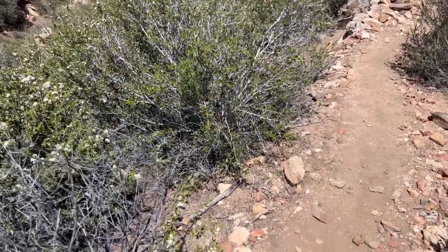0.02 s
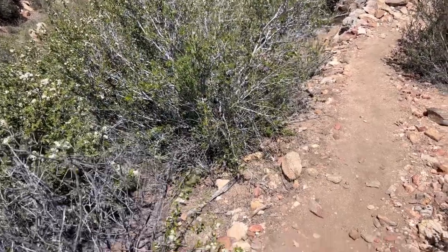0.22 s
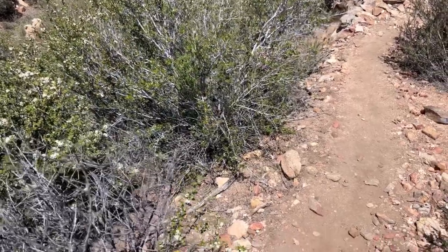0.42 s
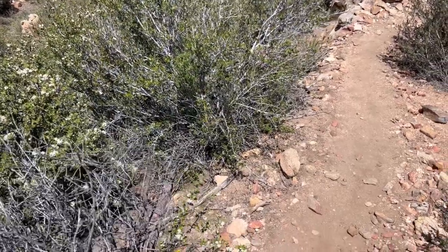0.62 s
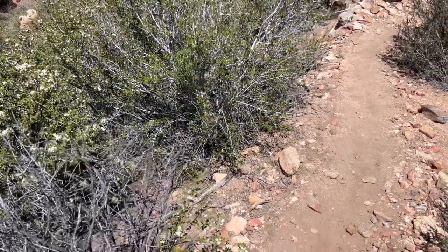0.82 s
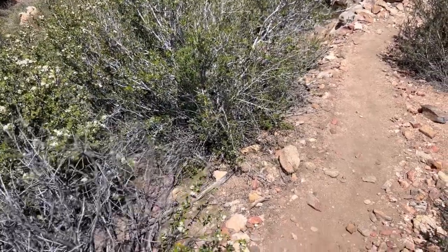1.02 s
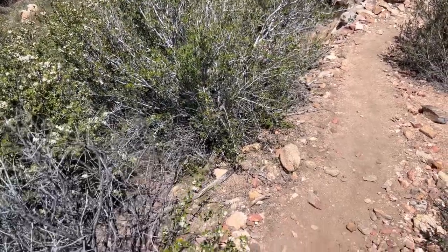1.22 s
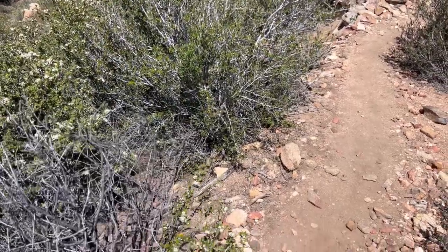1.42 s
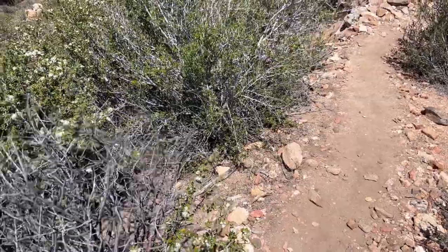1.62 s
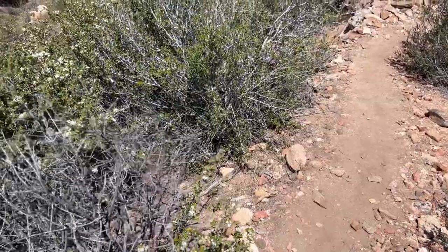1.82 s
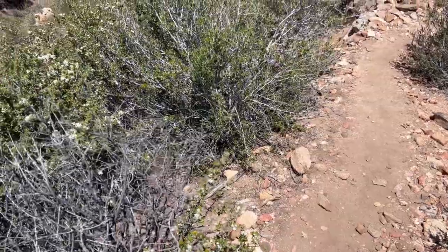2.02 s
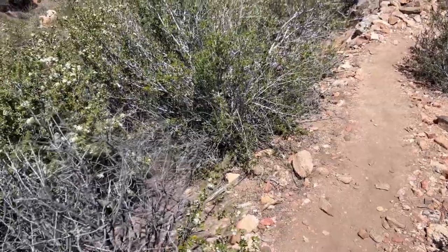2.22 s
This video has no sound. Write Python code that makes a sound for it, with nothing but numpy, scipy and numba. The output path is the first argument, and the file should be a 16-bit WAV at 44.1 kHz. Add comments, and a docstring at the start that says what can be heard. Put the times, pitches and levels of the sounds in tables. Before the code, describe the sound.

A rattlesnake's steady dry high buzz from a bush, under low wind rumble thumping the microphone

```python
"""A steady dry buzz over a low wind rumble: a rattlesnake shakes its tail inside a bush by a dirt trail.
The tail's hollow segments knock together, ring, and scatter off twigs, stems and ground.
A breeze, made of shaped noise, rumbles on the microphone, mostly at the left port, and thumps it twice
deeply; one faint, higher thud follows. A shoe shifts on the grit: short noise bursts for the small stones,
a click for a snap, a pulse for the heel."""
import sys
import numpy as np
from scipy import signal
from scipy.fft import rfft, irfft, next_fast_len
from scipy.io import wavfile
from scipy.ndimage import uniform_filter1d
from numba import njit

SR = 44100
rng = np.random.default_rng(int(sys.argv[2]) if len(sys.argv) > 2 else 0)


def to_wav(s):
    """Save 16-bit WAV."""
    ch = np.atleast_2d(s).T  # columns
    pcm = np.round(np.clip(ch, -1, 1) * 32767)  # PCM
    wavfile.write(sys.argv[1], SR, pcm.astype(np.int16))


N = 101430
T = np.arange(N) / SR  # seconds


def undb(db):
    """Decibels to gain."""
    return 10 ** (np.asarray(db) / 20)


def unit(x):
    """Scale to rms 1."""
    return x / np.sqrt(np.mean(x ** 2) + 1e-20)


def curve(rows):
    """Gain over time along a table of (s, dB)."""
    return undb(np.interp(T, *np.array(rows).T))


def colour(x, points):
    """Causal minimum-phase filter of unit power gain through (Hz, dB) points."""
    size = next_fast_len(N + 8192)
    size += size % 2
    hz, db = np.array(points, float).T
    bin_hz = np.arange(size // 2 + 1) * SR / size
    gain = undb(np.interp(np.log(bin_hz + 1), np.log(hz), db))
    # folding the cepstrum onto positive time makes the filter causal
    cepstrum = irfft(np.log(unit(gain)))
    cepstrum[1:size // 2] *= 2
    cepstrum[size // 2 + 1:] = 0
    response = np.exp(rfft(cepstrum))
    return irfft(rfft(x, size) * response)[..., :N]


def band(x, hz, width_hz):
    """One fixed resonance."""
    return signal.lfilter(*signal.iirpeak(hz, hz / width_hz, fs=SR), x)


@njit
def sweep(x, hz, width):
    """A resonance whose centre moves: a state-variable filter retuned at every sample."""
    y, b, l = np.empty(len(x)), 0., 0.  # output, band state, low state
    for i in range(len(x)):
        g, k = np.tan(np.pi * hz[i] / SR), width / hz[i]
        v = (b + g * (x[i] - l)) / (1 + g * (g + k))
        b, l, y[i] = 2 * v - b, l + 2 * g * v, k * v
    return y


def walk(rate):
    """Smooth random drift with spread 1, drawn afresh about `rate` times a second."""
    hold = int(SR / rate)
    steps = np.repeat(rng.standard_normal(N // hold + 1), hold)
    smooth = uniform_filter1d(uniform_filter1d(steps, hold), hold)[:N]
    return unit(smooth - smooth.mean())


def push(at, width):
    """A short pressure pulse that swings back on either side."""
    u = ((T - at) / width) ** 2
    return (1 - u) * np.exp(-u / 2)


AIR_DB, AIR_SIDE_DB = -54.5, -8  # level; left-right difference relative to it
# Colour of the open air. Each row: frequency in Hz, density in dB per Hz (relative).
AIR_COLOUR = [(100, -6.5), (400, 4), (700, -0.5), (1150, -6), (1600, -0.5), (2400, -4.5), (4000, -3),
              (8000, -9), (10300, -54), (11200, -28.5), (12500, -22), (13500, -40), (15500, -9.5)]


def air():
    """Faint hush of the open hillside: coloured noise with a weaker part opposed between the ports."""
    mid, side = colour(rng.standard_normal((2, N)), AIR_COLOUR)
    return undb(AIR_DB) * (mid + undb(AIR_SIDE_DB) * side * np.array([[1], [-1]]))


def turbulence(shape, even_s):
    """Coloured noise whose strength is evened over spans longer than even_s, leaving rms near 1."""
    x = colour(rng.standard_normal(N), shape)
    power = uniform_filter1d(np.abs(signal.hilbert(x)) ** 2 / 2, max(int(even_s * SR), 1))
    return x / np.sqrt(power + 1e-9)


GUST_LIMIT = .7  # envelope ceiling


def level_off(x):
    """The strongest gusts level off smoothly and stay round."""
    strength = uniform_filter1d(np.abs(signal.hilbert(x)), size=220)  # about 5 ms
    return x / (1 + (strength / GUST_LIMIT) ** 4) ** (1 / 4)


WIND_PAN_DB, WIND_APART_DB = 10, -17.5  # right port weaker by; its own rumble relative to the breeze
FLUTTER_DB = -46.5  # flutter around 200 Hz between the eddies
PORT_LOW_HZ, PORT_TOP_HZ = 29.2, 1780  # pass band of the port for wind
# Breeze and eddy levels hold before the level-off; thumps join after it, before the port filter.
# The breeze. Each row: time in seconds, level in dB.
BREEZE_LEVEL = [(0, -23), (.15, -24.5), (.26, -22), (.36, -19.5), (.46, -22.5), (.56, -24.5), (.74, -23.5),
                (.84, -33), (.93, -21), (.98, -27.5), (1.015, -21), (1.06, -27.5), (1.18, -21.5),
                (1.26, -26), (1.41, -25.5), (1.55, -27.5), (1.64, -31.5), (1.84, -26), (1.95, -28.5),
                (2.12, -30), (2.3, -23)]
# Eddies that buffet the port. Each row: middle in seconds, half length in seconds, rumble in dB,
# flutter in dB.
BUFFETS = [(0.122, .012, -42, -34.5), (0.193, 0.023, -49, -38.5), (0.248, 0.0091, -25.5, -35.5),
           (.388, 0.0064, -11, -27), (0.438, 0.02, -20.5, -34.5), (0.608, 0.0088, -21.5, -21.5),
           (0.634, 0.015, -6.5, -16.5), (0.663, .011, -12, -29), (0.831, 0.0095, -28.5, -43),
           (0.932, 0.014, -23, -56), (0.983, 0.0055, -45, -44), (1.012, 0.0085, -23, -64),
           (1.096, 0.012, -21, -55), (1.178, 0.0092, -20, -61), (1.314, .011, -17.5, -46),
           (1.344, .01, -16, -25.5), (1.464, 0.011, -27.5, -38.5), (1.528, 0.0088, -34, -37),
           (1.569, 0.01, -24, -41), (1.741, 0.0083, -26, -38), (1.817, 0.013, -27, -47),
           (2.181, 0.0078, -33, -34.5)]
# Two deep thumps, then a faint, higher thud. Each row: middle in seconds, width in seconds, peak in dB.
THUMPS = [(0.402, 0.0018, 2), (0.618, 0.0019, -3), (.98, 0.00068, -36)]
# Colours of breeze, eddy rumble and flutter. Each row: frequency in Hz, density in dB per Hz (relative).
BREEZE_COLOUR = [(15, -25.5), (28, -21.5), (45, 1), (70, 4), (100, -3.5), (125, -15.5), (190, -25),
                 (255, -36), (400, -65.5), (2000, -99)]
BUFFET_COLOUR = [(20, -43), (50, 1), (82, 13.5), (115, 1.5), (165, -5.5), (245, -24), (320, -29),
                 (420, -53), (800, -70), (2000, -73)]
FLUTTER_COLOUR = [(60, -28), (120, 5), (170, 7), (255, -2.5), (305, -22.5), (400, -27.5), (800, -43),
                  (2000, -87.5)]


def wind():
    """Turbulent pressure at the ports: breeze, eddies that rumble and flutter, thumps; strongest at left."""
    breeze = curve(BREEZE_LEVEL)
    swells = np.array([np.exp(-np.abs((T - at) / half) ** 3 / 2) for at, half, _, _ in BUFFETS])
    rumble, flutter = undb(np.array(BUFFETS)[:, 2:].T) @ swells
    thumps = sum(undb(db) * push(at, width) for at, width, db in THUMPS)

    gusts = breeze * turbulence(BREEZE_COLOUR, 0.038)
    gusts = gusts + rumble * turbulence(BUFFET_COLOUR, 0.031)
    gusts = gusts + (undb(FLUTTER_DB) + flutter) * turbulence(FLUTTER_COLOUR, 0.02)
    left = level_off(gusts) - thumps

    apart = undb(WIND_APART_DB) * breeze * turbulence(BREEZE_COLOUR, 0.036)
    right = left * undb(-WIND_PAN_DB) + apart
    port = signal.butter(2, [PORT_LOW_HZ, PORT_TOP_HZ], "bandpass", fs=SR, output="sos")
    return signal.sosfiltfilt(port, np.array([left, right]), padtype="even")


SNAP_S, SNAP_DB = 2.0035, -9  # one stone snaps; click peak before colouring
HEEL_S, HEEL_WIDTH_S, HEEL_DB = 2.0125, .0027, -18  # middle, width and peak of the thud
# Grit under the shoe. Each row: start in seconds, level in dB, decay to 1/e in seconds,
# high crackle in dB relative to that level.
GRIT = [(0.268, -44.5, 0.0036, -8.5), (0.4885, -45.5, 0.0012, 4), (0.508, -44, 0.0025, -3.5),
        (0.711, -45.5, 0.003, -15), (0.79, -44, 0.0024, -18), (0.98, -54.5, 0.0041, 5.5),
        (1.639, -40, 0.0032, -23), (1.917, -48.5, 0.004, -2), (1.964, -47.5, 0.024, -4),
        (1.982, -47.5, 0.0071, -15), (1.99, -50, 0.0069, -5), (2.0031, -27, 0.0017, -16.5),
        (2.009, -41.5, 0.011, -16), (2.058, -48, 0.015, -17), (2.213, -42.5, 0.0057, -16),
        (2.253, -49, 0.0048, -16)]
# Colours of grit and high crackle. Each row: frequency in Hz, density in dB per Hz (relative).
GRIT_COLOUR = [(200, -11), (450, 3), (750, 5), (1200, 6), (1900, -1), (2800, -20), (4500, -15), (9000, -51)]
CRACKLE_COLOUR = [(600, -47), (1200, -7), (2200, 4), (3000, 5), (4500, -17), (9000, -35)]


def shoe():
    """Small stones scrape in decaying noise bursts and one snaps; the heel settles with a soft thud."""
    bursts = [undb(db) * (T >= at) * np.exp(-np.abs(T - at) / decay) for at, db, decay, _ in GRIT]
    high = sum(burst * undb(row[3]) for burst, row in zip(bursts, GRIT))
    snap = undb(SNAP_DB) * (np.arange(N) == int(SNAP_S * SR))
    grit = colour(snap + sum(bursts) * rng.standard_normal(N), GRIT_COLOUR)
    crackle = colour(high * rng.standard_normal(N), CRACKLE_COLOUR)
    heel = undb(HEEL_DB) * push(HEEL_S, HEEL_WIDTH_S)
    return grit + crackle + heel


SHAKE_HZ, SHAKE_DRIFT = 59.93, .025  # tail cycles a second; their drift as a fraction
STROKE_SPREAD, KNOCK_SCATTER_DB = .17, 1  # scatter of the knocks in strokes; their unevenness


def knocks(count=12):
    """At both ends of each swing of the tail the segments knock together: a cluster of scattered clicks."""
    strokes = np.cumsum(2 * SHAKE_HZ * (1 + SHAKE_DRIFT * walk(4))) / SR
    chance = rng.standard_normal((int(strokes[-1]) + 1, count, 2))
    when = np.arange(len(chance))[:, None] + STROKE_SPREAD * chance[..., 0]
    where = np.searchsorted(strokes, when).ravel()
    sign = (-1) ** np.arange(count)
    size = (undb(KNOCK_SCATTER_DB * chance[..., 1]) * sign).ravel()
    return np.bincount(where, size * (where > 0), N + 1)[:N]


TWIG_T60_S, TWIG_DB = 0.06, 4.5  # time to fall 60 dB; scattered sound relative to the knock


def bush(x):
    """Twigs and ground scatter each knock into a short diffuse tail of noise."""
    decay = np.exp(-2 * np.log(1000) / (TWIG_T60_S * SR))
    power = signal.lfilter([1 - decay], [1, -decay], x ** 2)
    return unit(x + undb(TWIG_DB) * np.sqrt(power) * rng.standard_normal(N))


ECHO_SPAN_S, ECHO_DRIFT_S, ECHO_DB = .007, .00004, 6  # span of lags, spread of drift, level over direct


def stems(x, count=9):
    """Short reflections off stems and ground comb the sound; the comb slides as the microphone drifts."""
    lags = ECHO_SPAN_S * (np.arange(count) + rng.uniform(0.21, 1, count)) / count
    fine = signal.resample_poly(x, 4, 1)  # finer grid for smooth moving delays
    grid = np.linspace(0, N, len(fine), endpoint=False)
    echoes = sum(np.interp((T - lag - ECHO_DRIFT_S * walk(1.52)) * SR, grid, fine) for lag in lags)
    return unit(x + undb(ECHO_DB) * unit(echoes))


RATTLE_LEFT_DB, RATTLE_RIGHT_DB = -45, -50  # coloured rattle at each port
RATTLE_APART_DB = -14.5  # scattered sound that differs between the ports, relative to the shared
RATTLE_WANDER_DB = .9  # spread of the sway in each band's gain
RING_WIDTH_HZ, RING_DB = 880, -49.5  # width of each of two passes; level before the strength curve
BODY_HZ, BODY_WIDTH_HZ, BODY_DB = 3940, 500, -53  # likewise for the lower resonance
# Colour of the rattle at each port. Each row: frequency in Hz, density in dB per Hz (relative).
RATTLE_LEFT = [(1200, -20.5), (2400, -6.5), (3000, -8), (3400, -8.5), (3800, 1), (4700, 6), (5400, 2.5),
               (6200, -2.5), (6800, -8.5), (7900, -19.5), (8800, -13), (10200, -20.5), (11200, -50.5)]
RATTLE_RIGHT = [(1200, -24), (2700, -6.5), (3300, -3), (3850, 8.5), (5000, -5.5), (6200, 4), (6800, -6),
                (7850, -1.5), (8120, 8.5), (8900, 0), (9600, -3), (10350, -25), (11200, -35.5)]
# Resonance of the hollow segments, shifting as the tail turns. Each row: time in seconds, centre in Hz,
# strength in dB.
RING = [(0, 5750, -3), (0.282, 5600, -11), (.44, 5760, 0), (.58, 5800, -4), (.72, 5470, -2.5),
        (.86, 5570, -12.5), (1.02, 5500, 0), (1.2, 5230, -11), (1.42, 6060, -10), (1.521, 5300, -6),
        (1.68, 5390, -2), (1.88, 5800, -2.5), (2.05, 5400, -5.5), (2.3, 5530, -4.5)]
# Lower resonance swelling as the tail turns. Each row: time in seconds, strength in dB.
BODY = [(0, -4), (.3, -2), (.6, -5.5), (.83, 0), (1.1, -1), (1.35, -6.5), (1.6, -10), (2.3, -28)]


def rattle():
    """Knocks ring the hollow segments through two resonances; the colour wanders as the tail sways."""
    hits, ports = knocks(), []
    at, centre, strength = np.array(RING, float).T
    ring_hz = np.interp(T, at, centre)
    ring_gain = undb(np.interp(T, at, strength))
    shared = bush(hits)
    body = band(band(bush(hits), BODY_HZ, BODY_WIDTH_HZ), BODY_HZ, BODY_WIDTH_HZ)
    body = unit(body) * curve(BODY) * undb(BODY_DB)
    sway = [(hz, undb(RATTLE_WANDER_DB * walk(11.0)) - 1) for hz in np.geomspace(3800, 8800, num=12)]

    for shape, db in ((RATTLE_LEFT, RATTLE_LEFT_DB), (RATTLE_RIGHT, RATTLE_RIGHT_DB)):
        heard = stems(unit(shared + undb(RATTLE_APART_DB) * bush(hits)))
        swaying = heard + sum(gain * band(heard, hz, 220) for hz, gain in sway)
        ring = sweep(bush(hits), ring_hz, float(RING_WIDTH_HZ))
        ring = unit(sweep(ring, ring_hz, float(RING_WIDTH_HZ)))
        hollow = body + ring * ring_gain * undb(RING_DB)
        ports.append(unit(colour(swaying, shape)) * undb(db) + hollow)
    return np.array(ports)


def scene():
    """Open air, wind, shoe and snake."""
    return air() + wind() + shoe() + rattle()


FULL_SCALE, TOP_HZ = 1.0, 15800  # recorder's ceiling and upper limit


def overload(x):
    """Peaks beyond full scale are flattened."""
    return x / (1 + (x / FULL_SCALE) ** 40) ** (1 / 40)


def record(dry):
    """The recorder clips the highest peaks and then cuts the top with a steep low-pass."""
    top_cut = signal.ellip(10, .2, 80, TOP_HZ, fs=SR, output="sos")
    return signal.sosfilt(top_cut, overload(dry))


dry = scene()
out = record(dry)
to_wav(out)
```